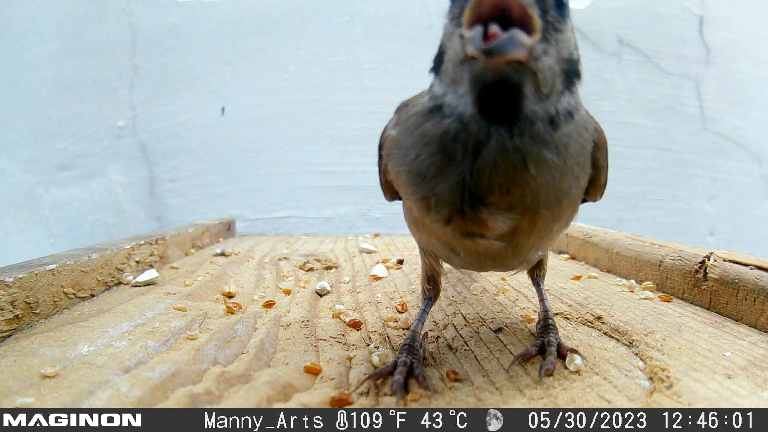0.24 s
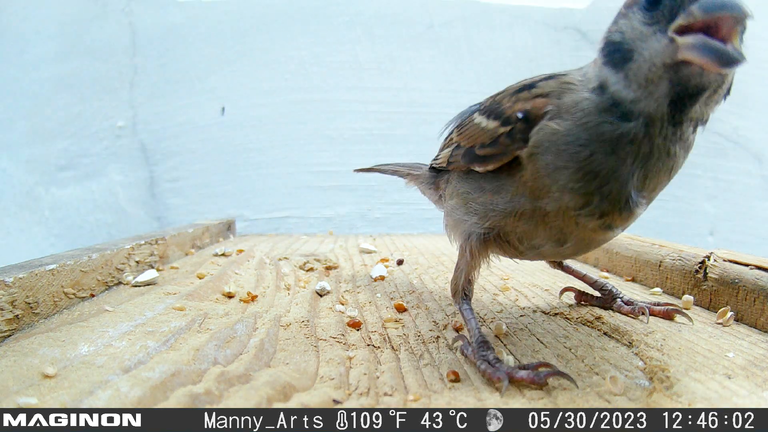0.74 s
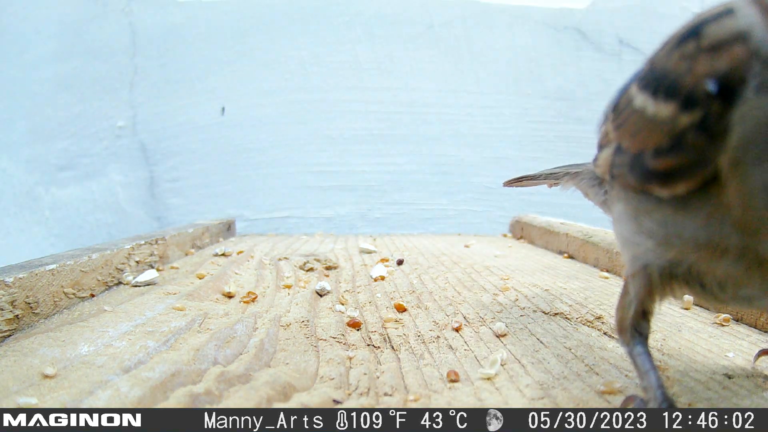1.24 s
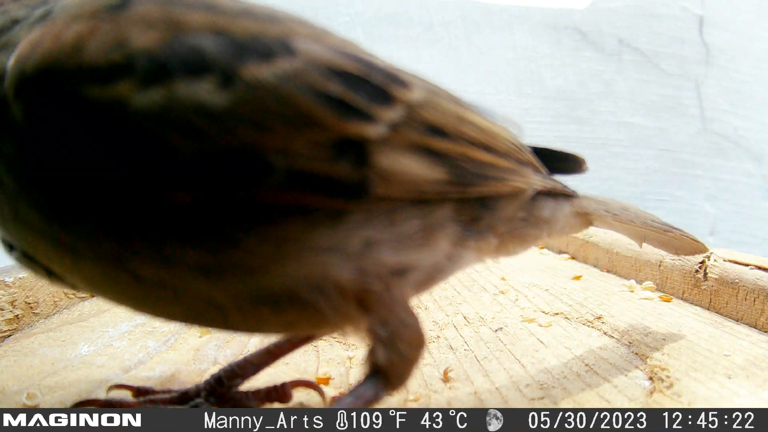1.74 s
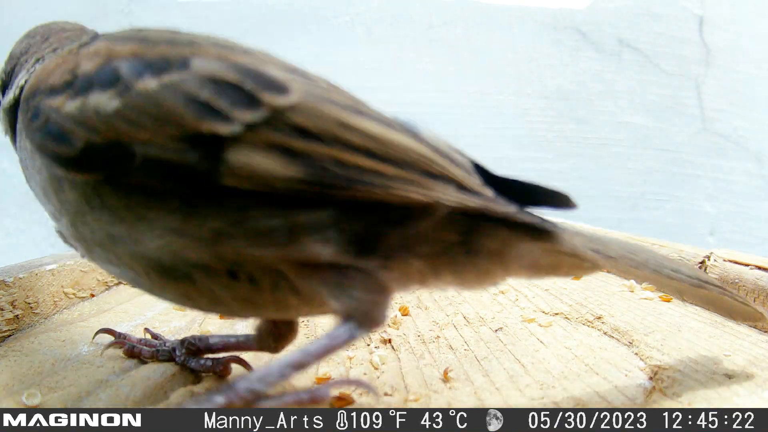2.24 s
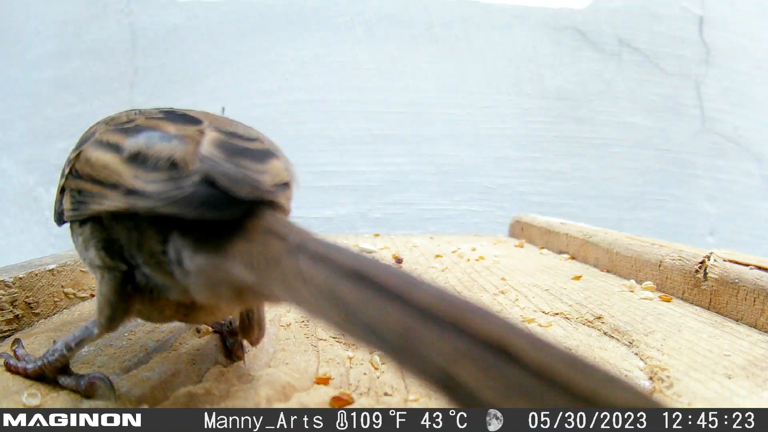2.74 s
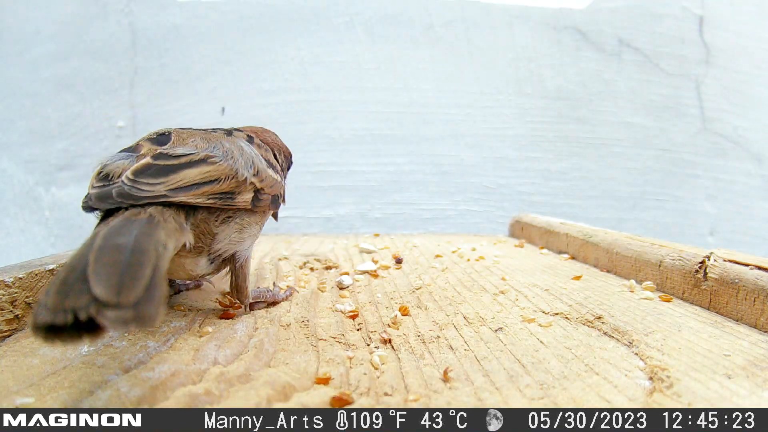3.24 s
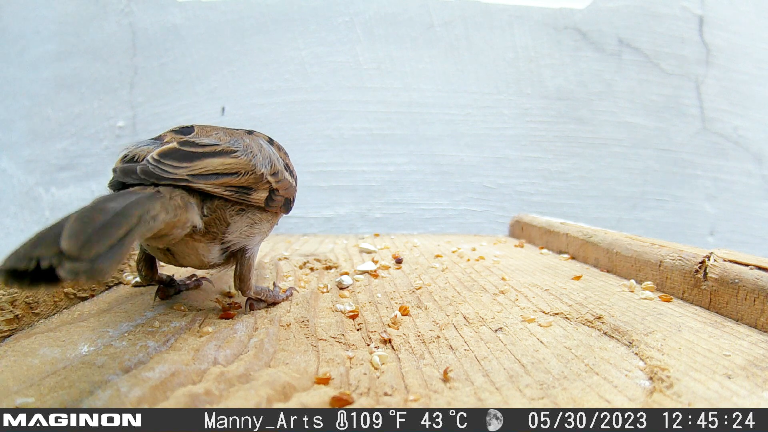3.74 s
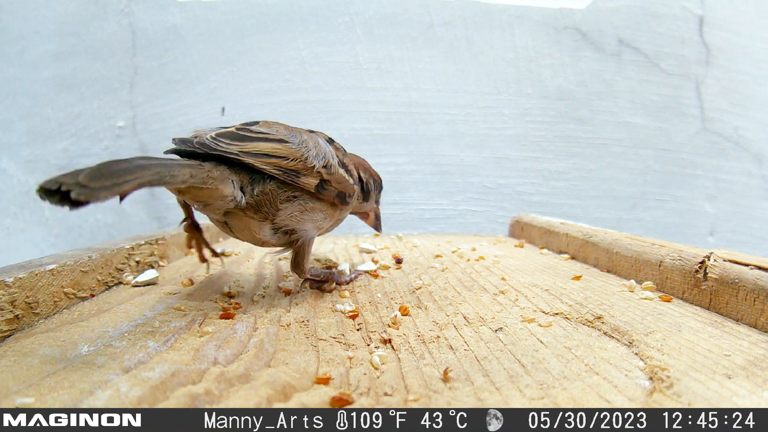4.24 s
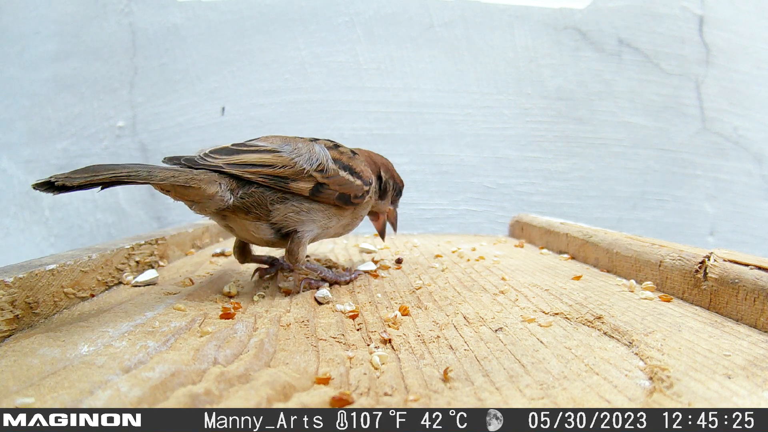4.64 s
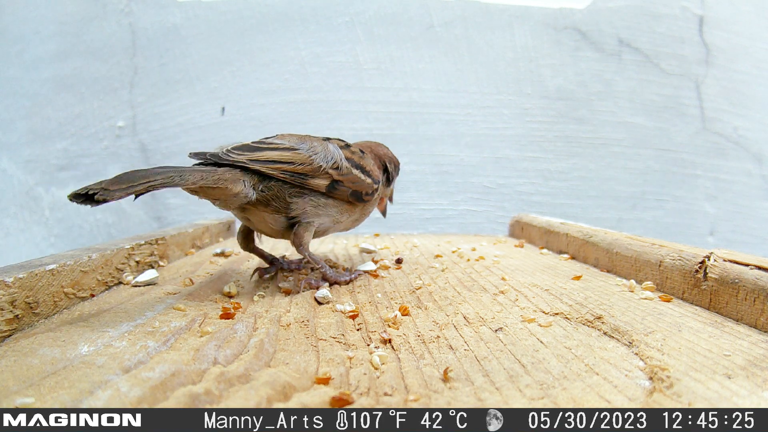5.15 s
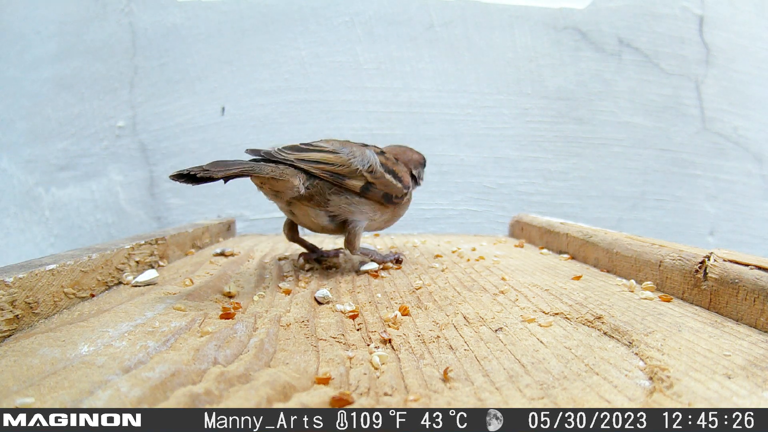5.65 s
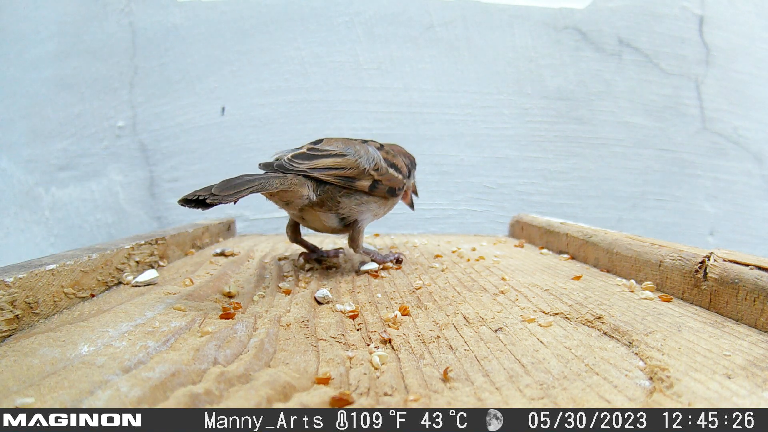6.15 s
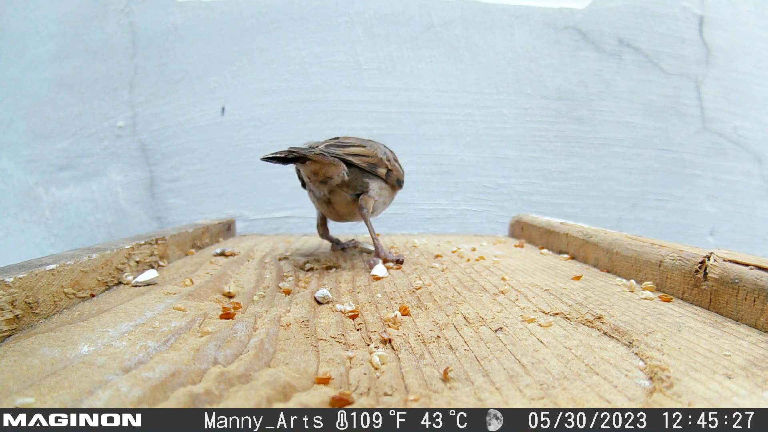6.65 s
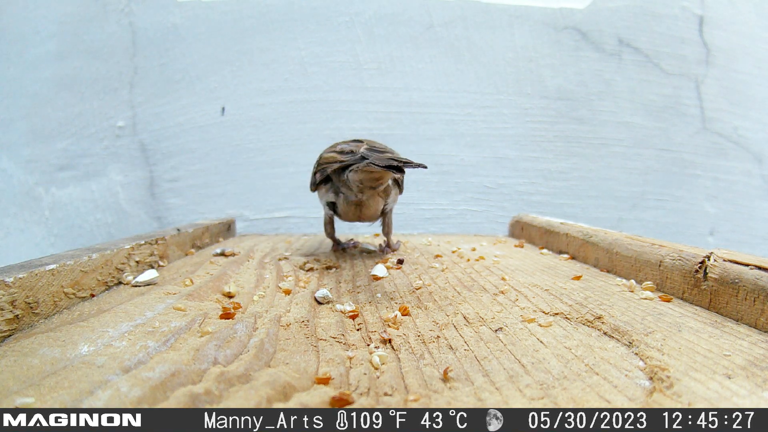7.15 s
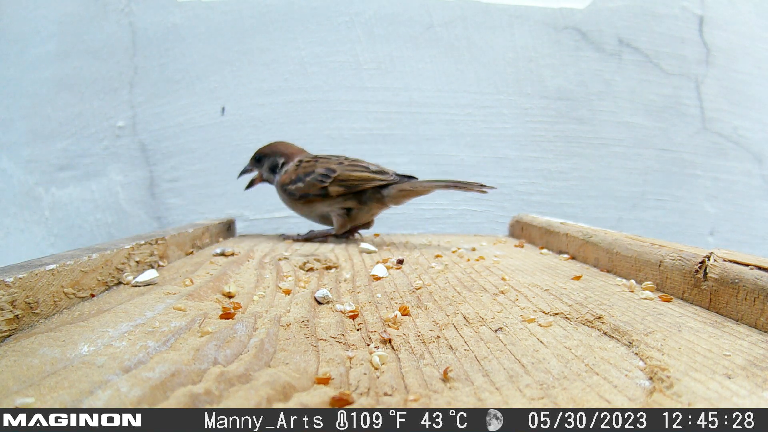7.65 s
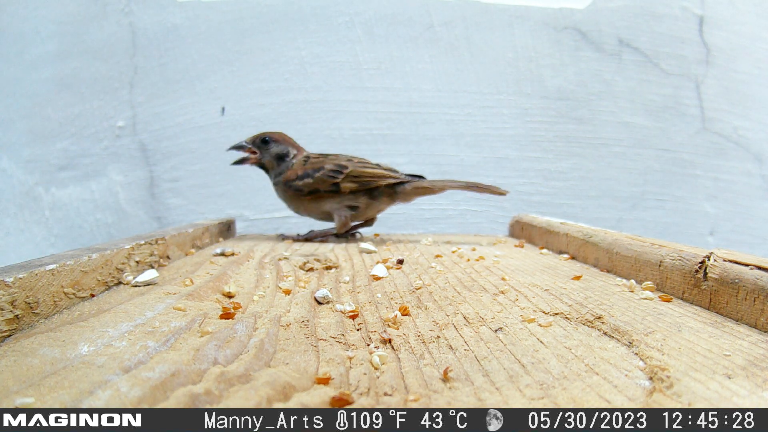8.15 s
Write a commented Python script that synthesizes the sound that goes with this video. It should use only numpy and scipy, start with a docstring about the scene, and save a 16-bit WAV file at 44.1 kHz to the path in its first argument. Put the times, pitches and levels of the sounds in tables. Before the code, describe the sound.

Outdoor feeder board heard through a boxy, slightly dull microphone: dry woody taps, scuffs and tiny seed rattles from a hopping sparrow. A busy opening stops in abrupt silence; then soft rumble swells back, with separate small bursts of contact, weak raspy chirps in the distance and finally a low chugging engine beneath the last hops.

```python
"""A wooden feeder board: a sparrow hops about, heard by a small trail camera fixed to the board.
Claws and beak tap and scuff the wood: bursts of tiny slips ring the modes of board and housing.
Far chirps are warbling sine pairs with echoes; a moan, a slow engine and thin hums are tonal.
Wind and traffic are filtered noise. All falls silent for 0.8 s, then wind, traffic and hum fade in;
a slow engine joins at 5.8 s."""
import sys
import numpy as np
from scipy import signal
from scipy.fft import rfft, irfft, next_fast_len
from scipy.io import wavfile

SR = 44100
rng = np.random.default_rng(int(sys.argv[2]) if len(sys.argv) > 2 else 0)


def wav_record(signal):
    """Record a signal, one row per channel, as 16-bit PCM in the file named by sys.argv[1]."""
    frames = np.transpose(np.atleast_2d(signal))
    bounded = np.clip(frames, -1, 1)
    # unit amplitude maps onto the largest positive 16-bit level
    quanta = np.round(bounded * 32767).astype(np.int16)
    wavfile.write(sys.argv[1], SR, quanta)


N = 370881
TIME_S = np.arange(N) / SR
DROP_S, RETURN_S = 1.628, 2.409   # start and end of the silence


def from_db(db):
    """Decibels to amplitude ratio."""
    return 10 ** (np.asarray(db) / 20)


def rms_one(x):
    """Scale to unit rms."""
    return x / np.sqrt(np.mean(x ** 2) + 1e-20)


def curve(rows):
    """Linear curve through (t/s, value) rows at every sample."""
    points_s, values = np.transpose(rows)
    return np.interp(TIME_S, points_s, values)


def drift(rate_hz):
    """Slow random curve of unit rms: noise through a double pole at rate_hz, run at SR / 40."""
    pole = np.exp(-80 * np.pi * rate_hz / SR)
    noise = rng.standard_normal(N // 40 + 2002)
    slow = signal.lfilter([1], [1, -2 * pole, pole * pole], noise)[2000:]   # drop the onset
    return np.interp(np.arange(N) / 40, np.arange(len(slow)), rms_one(slow))


def coloured(spectrum, flicker_db):
    """Unit-rms noise shaped by (f/Hz, level/dB) rows, its level flickering by flicker_db rms."""
    size = next_fast_len(N)
    hz = np.arange(size // 2 + 1) * SR / size + 1   # + 1 avoids log(0)
    points_hz, points_db = np.transpose(spectrum)
    shape_db = np.interp(np.log(hz), np.log(points_hz), points_db, left=-90, right=-90)
    noise = irfft(from_db(shape_db) * rfft(rng.standard_normal(size)), size)[:N]
    return rms_one(noise * from_db(flicker_db * drift(13)))


def ring(force, hz, t60_s):
    """Two-pole resonator: a unit click rings a decaying sine of initial height 1."""
    radius = from_db(-60 / (t60_s * SR))
    w = 2 * np.pi * hz / SR
    return signal.lfilter([0, np.sin(w)], [1, -2 * radius * np.cos(w), radius ** 2], force + 1e-18)


def taps():
    """Each contact is a run of tiny slips driving every mode; weight drives the low modes, scratch the high."""
    # claw and beak contacts: t/s, weight/dB, knock/dB, knock f/Hz, scratch/dB, scratch f/Hz, contact/ms
    contacts = np.array([(0.017, -65, -69, 2100, -55, 4150, 2.9), (0.054, -64, -56, 800, -54, 4200, 3.5),
                         (0.065, -31, -34, 1850, -42.5, 5300, 5.9),
                         (0.095, -33, -39, 2070, -47.5, 3700, 4.7), (0.469, -54, -60, 1400, -64, 5000, 9.3),
                         (0.524, -29.5, -36, 810, -47.5, 5200, 7.7),
                         (0.545, -56, -33.5, 1270, -44.5, 3000, 3.6),
                         (0.586, -47, -41.5, 710, -43, 4500, 18), (0.624, -47, -72, 900, -57, 4470, 16),
                         (0.669, -52, -63, 1400, -51.5, 5000, 22), (0.682, -65, -44, 1010, -42, 3860, 21.5),
                         (0.715, -46, -47, 1900, -54, 6000, 9.2),
                         (0.724, -36.5, -42.5, 1290, -35, 5140, 7.7), (0.74, -51, -32.5, 910, -36, 4400, 5),
                         (0.742, -48, -30.5, 1240, -35.5, 5260, 5.1),
                         (0.81, -51, -49, 1000, -55, 5000, 4.9), (0.851, -54, -60, 620, -57, 5800, 3.2),
                         (0.939, -70, -57, 1050, -53, 4930, 6), (0.955, -49, -53, 900, -52, 5440, 3),
                         (1.001, -55, -33.5, 1150, -44.5, 3960, 6.2),
                         (1.019, -35, -43.5, 620, -51, 3400, 13), (1.348, -50, -38, 2150, -50, 5170, 3.8),
                         (2.7, -51, -55.5, 624, -61, 4460, 9.2), (2.75, -66, -63, 620, -66, 5000, 3.8),
                         (3.187, -58, -51.5, 660, -52.5, 3840, 23), (3.221, -57, -55, 620, -59, 3200, 7.1),
                         (3.267, -39, -63, 2000, -58, 6500, 8.2),
                         (3.278, -38, -41.5, 830, -52.5, 3500, 6.7),
                         (3.309, -37, -39.5, 1300, -56, 6000, 9.2),
                         (4.324, -32.5, -42.5, 1160, -41, 3670, 7.2), (4.344, -43, -53, 800, -63, 3200, 4),
                         (4.375, -67, -45, 1030, -51, 4600, 9.7), (4.393, -38.5, -57, 620, -53, 3820, 3.3),
                         (4.408, -43, -58, 614, -61, 3420, 4.4), (4.423, -68, -49, 1180, -52, 3030, 5.8),
                         (4.441, -63, -50, 1340, -41.5, 5370, 2.6), (4.462, -41, -42, 1000, -56.5, 3600, 5),
                         (4.499, -62, -62, 1150, -62, 3100, 2.3), (4.547, -67, -75, 1800, -60, 4200, 2),
                         (5.257, -33.5, -42.5, 670, -40, 3300, 5.8),
                         (5.309, -43, -56, 2000, -57, 5500, 6.6), (5.316, -57, -61, 1300, -54, 3700, 9.2),
                         (5.329, -51, -55, 1210, -55, 3200, 8), (5.347, -34, -27, 1240, -47.5, 6500, 1.5),
                         (5.354, -59, -33.5, 596, -58, 6500, 3), (6.411, -65, -67, 800, -54, 3600, 10),
                         (6.418, -39, -41.5, 1090, -42.5, 4050, 7.4),
                         (6.503, -57, -46, 1200, -57, 2920, 11), (6.533, -58, -58, 1200, -51, 4500, 1.4),
                         (6.62, -50, -69, 1150, -56.5, 3830, 2.7), (6.8, -53, -67, 650, -56, 5800, 5),
                         (6.841, -44, -46, 1230, -56.5, 6300, 5.3),
                         (7.498, -42.5, -51, 1000, -52, 5740, 16), (7.52, -46, -53, 900, -46, 6030, 17),
                         (7.534, -58, -54, 800, -51, 5000, 7.8), (7.561, -53, -59, 1050, -62, 6000, 11),
                         (7.59, -35, -33.5, 1110, -43.5, 3200, 6.2),
                         (7.605, -32.5, -34.5, 1000, -47, 3760, 9.4)])
    # modes of board and camera housing: f/Hz, relative level/dB, t60/s
    modes = [(260, -19.5, 0.052), (302.5, 1.5, 0.064), (453, -0.5, 0.098), (614.4, 4, 0.089),
             (790, -5, 0.062), (894, 0, 0.078), (1007, 2, 0.061), (1128, -1.5, 0.051), (1297, -5.5, 0.053),
             (1508, -6.5, 0.046), (1718, -1, 0.027), (1930, -1, 0.043), (2101, 3, 0.03), (2260, -9, .015),
             (2570, -1.5, 0.021), (2743, -2, 0.0096), (3025, -0.5, 0.02), (3214, 3.5, 0.025),
             (3436, -4, 0.029), (3730, -10, 0.02), (4250, -16, 0.0075), (4590, -9.5, 0.0064),
             (5460, -12, 0.012), (5970, 0.5, 0.0081), (7140, -7, 0.0043), (6600, -17, 0.0091),
             (7670, 11.5, 0.0071), (7300, -1, 0.012)]
    start_s, weight_db, knock_db, knock_hz, scratch_db, scratch_hz, contact_ms = contacts.T
    # drive parts: level/dB, centre/Hz, loss/(dB per octave away)
    parts = [(weight_db, 313, 18.5), (knock_db, knock_hz, 16), (scratch_db, scratch_hz, 11.5)]
    length = 4400
    shape = (len(contacts), length)

    contact_ms = np.clip(contact_ms, 0.5, 30)[:, None]
    u = np.arange(length) / (contact_ms * SR / 1000)
    # short contacts strike at once, long scuffs swell first
    pressure = u ** (0.06 * contact_ms) * np.exp(-2.6 * u ** 1.8)
    # loose seeds rattle on
    pressure += 0.07 * np.minimum(u, 1) * np.exp(-np.arange(length) / (0.011 * SR))
    sparse = rng.random(shape) < 5000 / SR   # 5000 slips per s
    slips = pressure * (sparse + 0.13) * rng.standard_normal(shape)
    # a brief contact opens with one firm blow
    slips[:, 8:9] += 2.6 * np.exp(-contact_ms / 6.2)

    spread = rng.standard_normal((len(contacts), len(modes)))
    rung = np.zeros(shape)
    for k, (hz, level_db, t60_s) in enumerate(modes):
        mode = ring(slips, hz, t60_s)
        drive = sum(from_db(db - fall_db * np.abs(np.log2(hz / centre_hz)))
                    for db, centre_hz, fall_db in parts)
        peak = drive * from_db(level_db + 2.0 * spread[:, k])
        rung += (-1) ** k * mode * (peak / np.abs(mode).max(axis=1))[:, None]
    rung *= np.sqrt(np.linspace(1, 0, length))

    out = np.zeros(N + length)
    first = np.round(start_s * SR).astype(int)[:, None]
    np.add.at(out, first + np.arange(length), rung)
    return out[:N]


def chirps():
    """Far sparrows: raspy arched chirps of two frequency-jittered sines, blurred by decaying-noise echoes."""
    # chirps: t/s, length/s, top f/Hz, level/dB before the second voice
    calls = [(3.346, 0.076, 3160, -66), (4.648, 0.094, 3100, -71), (5.191, 0.044, 3290, -60.5),
             (5.578, 0.075, 3280, -60.5), (5.986, 0.088, 3170, -72), (6.156, 0.085, 3435, -60.5),
             (7.066, 0.05, 3110, -64.5), (7.215, 0.06, 3300, -66)]
    out, unsteady, warble = np.zeros(N), drift(160), drift(220)
    for start_s, length_s, top_hz, db in calls:
        u = np.linspace(0, 1, int(length_s * SR))
        first = int(start_s * SR)
        span = slice(first, first + len(u))
        arch_hz = top_hz * np.interp(u, [0, 0.45, 1], [0.81, 1, 0.84])
        lower_hz = arch_hz + 330 * unsteady[span]
        upper_hz = 1.75 * arch_hz[0] - 500 * u + 750 * warble[span]
        lower = np.sin(2 * np.pi * np.cumsum(lower_hz) / SR)
        upper = np.sin(2 * np.pi * np.cumsum(upper_hz) / SR)
        out[span] += from_db(db) * np.sin(np.pi * u) ** 0.12 * (lower + 0.34 * upper)
    lags = np.arange(int(SR / 8))
    echoes = rng.standard_normal(len(lags)) * from_db(-60 * lags / SR / 0.14)   # t60 0.14 s
    return signal.fftconvolve(out, echoes / np.sqrt(np.sum(echoes ** 2)))[:N]


def moan():
    """Short low moan far off: a narrow noise band (a randomly modulated carrier) swells and fades."""
    start_s, length_s, edge_s, hz, level_db = 0.265, 0.19, 0.058, 475, -51.5
    t = TIME_S - start_s
    swell = np.clip(np.minimum(t, length_s - t) / edge_s, 0, 1)
    wobble = drift(45) + 1j * drift(57)
    return swell * from_db(level_db) * np.real(wobble * np.exp(2j * np.pi * hz * t))


def engine():
    """Slow engine drawing near: sines at low multiples of a rising rate, each wavering on its own."""
    # engine level: t/s, level/dB
    level = [(5.8, -71), (6.1, -41), (6.35, -38), (6.55, -45.5), (6.8, -38), (7.3, -39.5), (7.7, -36),
             (8.41, -38)]
    # orders: multiple of the rate, relative level/dB
    orders = [(2, -8), (2.5, -8), (3, -10), (4, 0), (5, -1), (6, -5), (7, -16), (8, -16), (9, -18),
              (10, -18), (12, -24)]
    # firing rate: t/s, f/Hz
    rate = [(5.8, 21.5), (6.45, 22.4), (6.72, 23.9), (7.75, 23.9), (8.41, 25.2)]
    phase = 2 * np.pi * np.cumsum(curve(rate)) / SR
    tone = 0
    for multiple, db in orders:
        height = from_db(db + 1.5 * drift(2.0))
        tone = tone + height * np.sin(multiple * phase + 0.25 * drift(3))
    return from_db(curve(level)) * tone


def hums():
    """Thin steady tones and a few very faint, short high tones: sines wavering a little in level and phase."""
    # tones: start t/s, end t/s, f/Hz, rms level/dB
    tones = [(-.1, 1.7, 325, -54), (2.6, 6.6, 280, -61), (6.44, 6.59, 3080, -72), (6.63, 6.69, 3400, -75),
             (8.03, 8.08, 3450, -75)]
    out = 0
    for start_s, end_s, hz, db in tones:
        gate = np.clip(np.minimum(TIME_S - start_s, end_s - TIME_S) / 0.01, 0, 1)
        height = np.sqrt(2) * from_db(db + 1.2 * drift(2.1))
        out = out + gate * height * np.sin(2 * np.pi * hz * TIME_S + 0.4 * drift(2.6))
    return out


def wind():
    """Wind on the microphone port: low noise with a steady floor and Gaussian buffets."""
    # spectrum: f/Hz, relative level/dB
    spectrum = [(6, -21), (15, -6.5), (35, -5.5), (60, -4), (100, -47.5)]
    # buffets: t/s, level/dB, half width/s
    buffets = [(0, -42, 0.24), (0.644, -33.5, 0.025), (5.899, -48, .2)]
    level = from_db(-50)
    for centre_s, db, width_s in buffets:
        level = level + from_db(db) * np.exp(-((TIME_S - centre_s) / width_s) ** 2)
    return level * coloured(spectrum, flicker_db=3.0)


def traffic():
    """Far traffic: passing deep rumble, a duller roar and the hiss of tyres and air, as three noise bands."""
    # spectra: f/Hz, relative level/dB
    rumble, roar, hiss = [(5.9, -44), (10, -21), (59, -1), (81, 0.5), (113, 0), (190, -18.5), (250, -49.5),
                          (420, -120)], [(88, -32.5), (150, -5), (248, -8.5), (330, -7.5), (476, -18),
                                          (549, -17), (697, -31.5), (900, -26), (1170, -38), (1980, -120)], [(410, -39.5), (700, -10), (759, -2.5), (894, -8.5),
                                                        (1030, -2), (1100, -7.5), (1210, -7.5), (1500, -3),
                                                        (1860, -11), (2350, -14.5), (3200, -11),
                                                        (4430, -30), (6800, -25), (7530, -19.5),
                                                        (8000, -41.5), (10400, -71), (17600, -120)]
    # rumble as traffic passes: t/s, level/dB
    rumble_level = [(0, -46), (.75, -42.5), (1.63, -47.5), (2.41, -44.5), (3.3, -41.5), (4, -42.5),
                    (5.3, -38.5), (5.9, -41.5), (6.8, -43.5), (8.41, -43.5)]
    return (from_db(curve(rumble_level)) * coloured(rumble, flicker_db=0.5)
            + from_db(-52.5) * coloured(roar, flicker_db=0.7)
            + from_db(-63.5) * coloured(hiss, flicker_db=1.57))


def housing():
    """Air noise keeps the housing's sharpest resonances faintly sounding: resonators fed white noise."""
    # resonances: f/Hz, rms level/dB, t60/s
    resonances = [(625, -76.5, 0.22), (880, -77, 0.051), (1010, -71, 0.069), (1112.6, -71, 0.087),
                  (1560, -79.5, 0.084), (3200, -79, 0.018), (7895, -78, 0.012)]
    return sum(from_db(db) * rms_one(ring(rng.standard_normal(N), hz, t60_s))
               for hz, db, t60_s in resonances)


def scene():
    """Sum of all sources; after the silence the background opens low and rises evenly in amplitude."""
    fade_from_db, fade_s = -18.5, 0.73
    rise = np.interp(TIME_S, [RETURN_S, RETURN_S + fade_s], [from_db(fade_from_db), 1])
    fade = np.where(TIME_S > DROP_S, rise, 1)
    background = wind() + traffic() + housing() + engine() + hums()
    return (fade * background + moan() + taps() + chirps())[None]


def record(dry):
    """Mute from DROP_S to RETURN_S, fade the last 4 ms and cut the top steeply."""
    gate = np.clip(np.maximum(DROP_S - TIME_S, TIME_S - RETURN_S) / 0.0014, 0, 1)
    ending = np.clip((N / SR - TIME_S) / 0.004, 0, 1)
    lowpass = signal.cheby2(12, 65, 8600, fs=SR, output="sos")   # 65 dB down from 8600 Hz up
    return signal.sosfilt(lowpass, dry * gate * ending)


dry = scene()
out = record(dry)
wav_record(out)
```